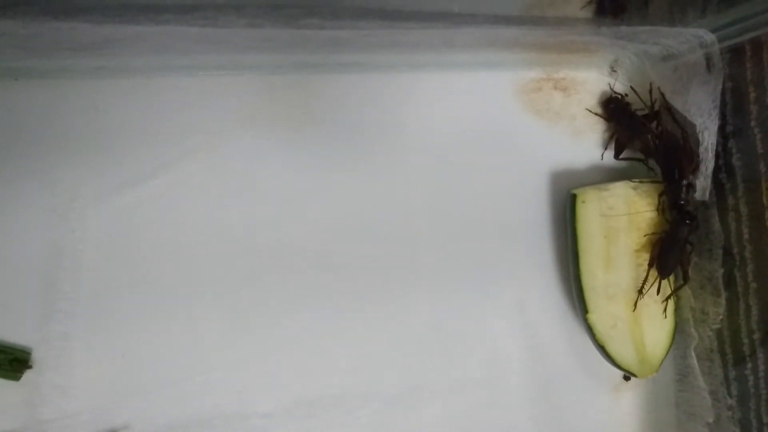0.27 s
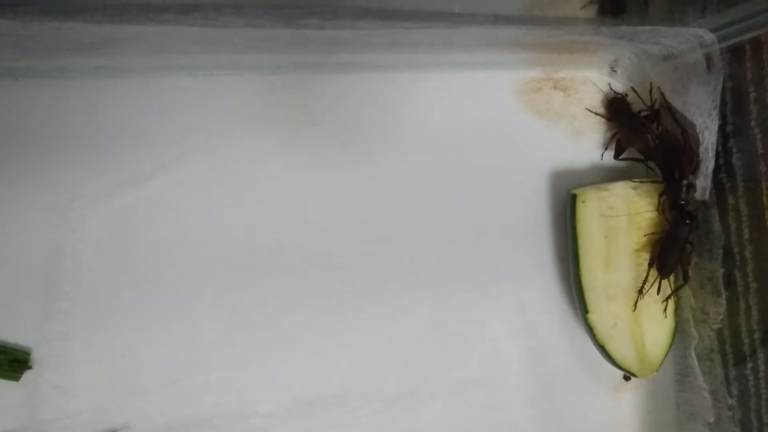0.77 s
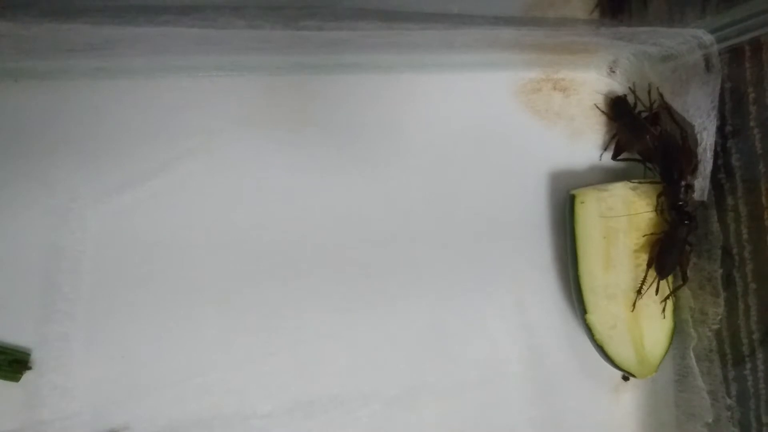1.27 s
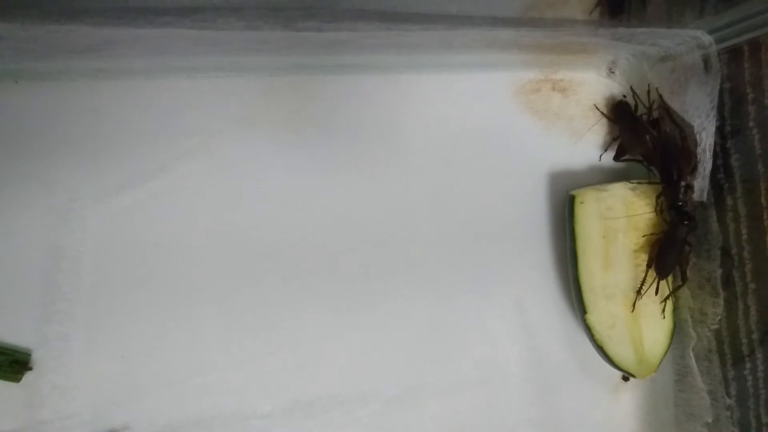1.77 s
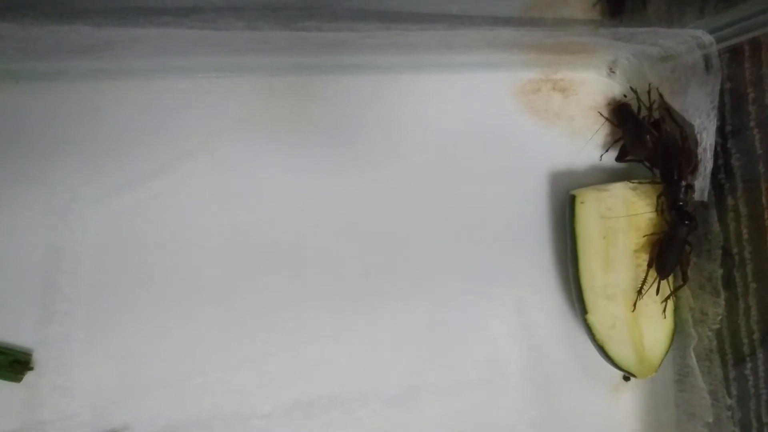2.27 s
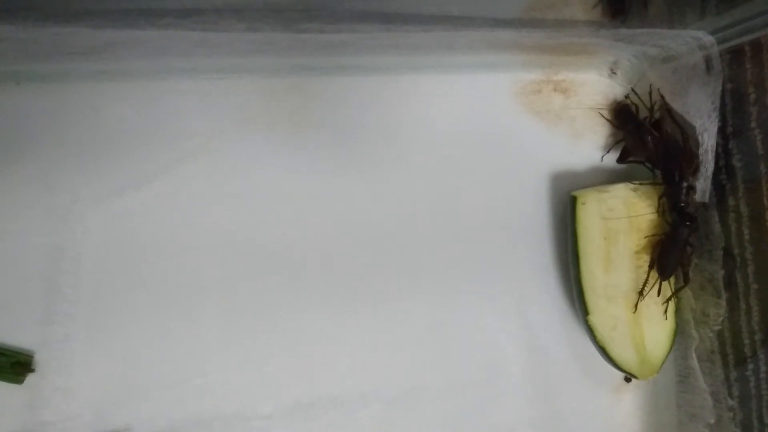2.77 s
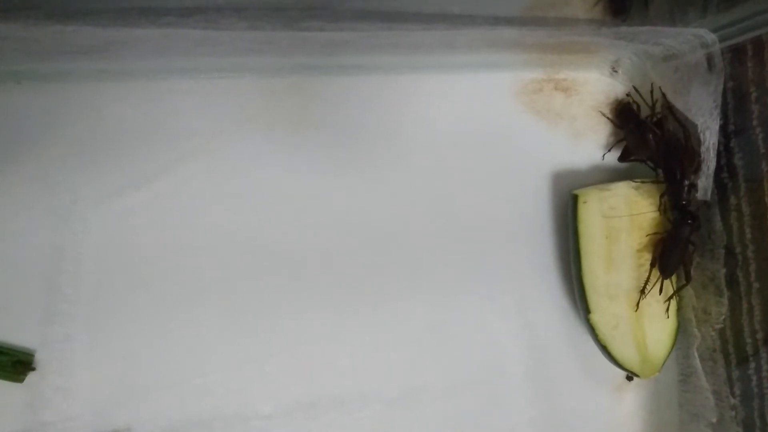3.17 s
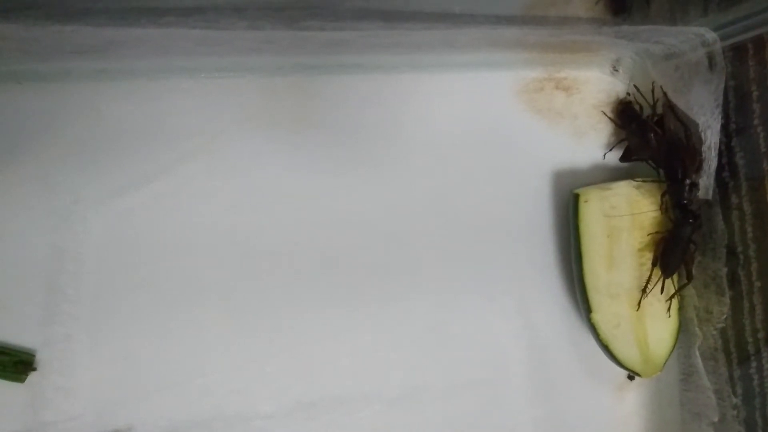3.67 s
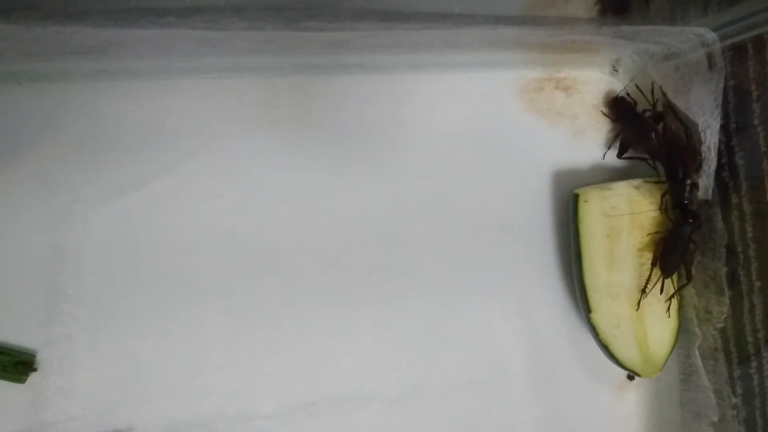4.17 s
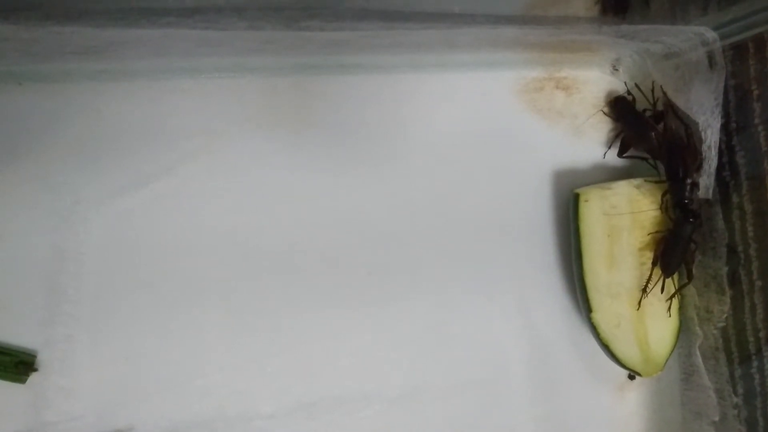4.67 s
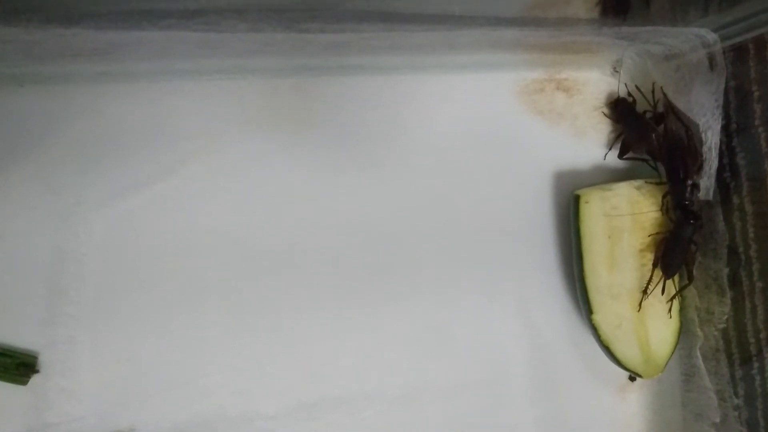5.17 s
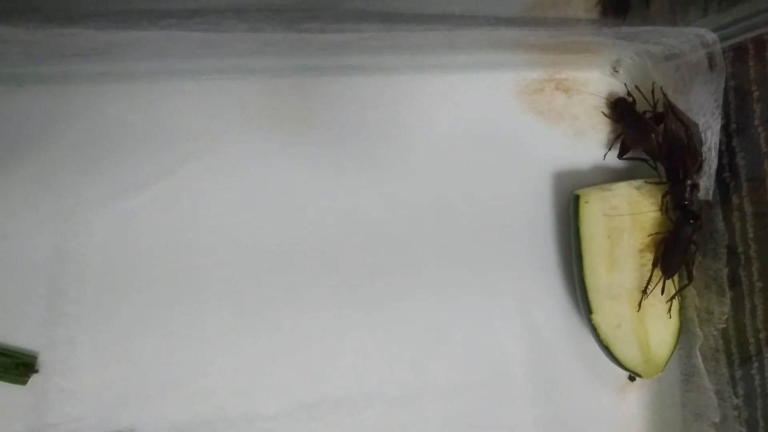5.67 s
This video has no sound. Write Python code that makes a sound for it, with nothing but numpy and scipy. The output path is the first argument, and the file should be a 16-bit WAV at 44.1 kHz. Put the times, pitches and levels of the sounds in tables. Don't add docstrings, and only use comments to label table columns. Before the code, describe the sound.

A cricket close by sings swelling pulsed chirps that run into long, steady, piercing trills, over a low fan hum in a small tub.

```python
import sys
import numpy as np
from scipy import signal
from scipy.fft import rfft, irfft, next_fast_len
from scipy.io import wavfile
from scipy.ndimage import uniform_filter1d

SR = 44100
rng = np.random.default_rng(int(sys.argv[2]) if len(sys.argv) > 2 else 0)


def dump(signal):
    limited = np.clip(np.atleast_2d(signal).T, -1, 1)
    pcm = np.round(limited * 32767).astype(np.int16)
    wavfile.write(sys.argv[1], SR, pcm)


def invert_db(x):
    u = np.asarray(x, float) / 20
    return 10 ** u


N = 261513

# pitch_hz, density_db (per Hz)
FAN_RUSH, FAN_RUSH_DB = [(15, -57.5), (25, -34), (59, -6.5), (208, -4.5), (234, -0.5), (345, -18.5),
                         (410, -25), (764, -29.5), (1040, -26.5), (1150, -38.5), (1760, -39.5), (2600, -30),
                         (3380, -17.5), (5720, -120)], -48
# pitch_hz, density_db (per Hz)
MIC_HISS, MIC_HISS_DB = [(2800, -9), (4500, 6.5), (5800, 1), (7000, -2.5), (8600, -5), (12000, -0.5),
                         (14000, 2), (15800, -12.5)], -50
# pitch_hz, likeness (0 to 1)
LIKENESS = [(60, 0.82), (200, 0.88), (550, 0.29), (1650, 0.03), (4970, 0.029), (15000, 0.098)]
# pitch_hz, left_over_right_db
LEAN = [(60, 2.5), (130, 7.5), (290, 8), (640, -1.5), (1410, 12.5), (3100, -5.5), (8600, 7), (10600, -0.5)]
# multiple (of the shaft rate), level_db
SHAFT_ORDERS = [(2, -89), (3, -58.5), (4, -55), (5, -53.5), (6, -50), (7, -59.5), (10.63, -69.5),
                (16.8, -77.5), (21, -75.5), (22.4, -75.5), (24, -72.5), (27, -69.5)]
SHAFT_HZ = 38.78
WHINE_HZ, WHINE_SWING_HZ, WHINE_DB = 14040, 198, -64

# start_s, level_db, pitch_hz
TICKS = [
    (0.079, -60, 5000),
    (0.296, -61, 1460),
    (1.718, -43.5, 1420),
    (4.666, -69, 1500),
    (4.797, -39, 10340),
    (4.81, -33.5, 10100),
    (4.837, -41, 10200),
    (4.882, -48, 10500),
]

# start_s, effort_db, scrape_db, first_pitch_hz, length_s
CHIRPS = [(0.108, -52, -60.5, 3800, 0.03666), (0.191, -41, -57.5, 3520, .032),
          (.270, -40.5, -55, 3950, 0.0385), (0.351, -37, -61.5, 4000, 0.039),
          (0.434, -32, -64, 3900, 0.046), (0.514, -26.5, -54.5, 3740, .050), (0.595, -22, -53, 3790, .051),
          (0.68, -21, -53.5, 3790, .050), (.763, -21, -54.5, 3790, .052), (.846, -20, -55, 3780, .051),
          (4.794, -48.5, -61, 3360, 0.026), (4.886, -41.5, -55.5, 3500, 0.029),
          (4.97, -39, -51.5, 3520, .024), (5.048, -38.5, -54.5, 3800, .037),
          (5.130, -36, -62, 3920, 0.0413), (5.214, -29, -59.5, 3950, 0.043),
          (5.298, -24.5, -56.5, 3720, 0.051), (5.379, -22, -56.5, 3790, 0.053),
          (5.462, -22.5, -51.5, 3810, .045), (5.545, -20.5, -50, 3780, 0.053),
          (5.632, -21, -53.5, 3800, .051)]
# start_s, effort_db, pitch_hz, scrape_db
TRILL_LONG = [(0.933, -31, 3452, -55.5), (0.9725, -30, 3463, -50), (1.009, -28.5, 3456, -54),
              (1.0493, -27, 3456, -52.5), (1.0931, -27.5, 3457, -64), (1.1353, -26.5, 3453, -55),
              (1.1756, -27, 3458, -54.5), (1.2173, -27.5, 3465, -52.5), (1.2607, -27, 3468, -51.5),
              (1.3023, -25.5, 3456, -53), (1.344, -26, 3460, -52), (1.3869, -26, 3465, -51.5),
              (1.4283, -26.5, 3472, -56), (1.4716, -25, 3470, -56), (1.512, -27.5, 3467, -55),
              (1.5546, -27, 3466, -53), (1.595, -26, 3466, -57), (1.6376, -26, 3466, -50.5),
              (1.6808, -25.5, 3447, -52), (1.722, -27, 3472, -49.5), (1.763, -26, 3457, -50),
              (1.805, -26.5, 3468, -47.5), (1.8489, -25.5, 3454, -55.5), (1.8897, -24.5, 3454, -51),
              (1.9339, -25, 3466, -53.5), (1.977, -25.5, 3450, -52), (2.0175, -27.5, 3480, -54.5),
              (2.059, -26.5, 3460, -51.5), (2.1023, -26, 3460, -51), (2.144, -25.5, 3463, -53.5),
              (2.186, -25.5, 3455, -56),
              (2.229, -25.5, 3464, -53.5), (2.2693, -26, 3463, -50), (2.312, -27, 3469, -49),
                 (2.354, -26.5, 3464, -54), (2.3946, -26.5, 3460, -53), (2.4401, -27.5, 3482, -51),
                 (2.4811, -27.5, 3462, -53), (2.5236, -26, 3460, -50.5), (2.5662, -26, 3433, -52),
                 (2.607, -27, 3440, -64), (2.648, -28, 3450, -50.5), (2.693, -27, 3440, -51.5),
                 (2.733, -26.5, 3436, -49.5), (2.7758, -27, 3464, -52.5), (2.8205, -26.5, 3445, -46.5),
                 (2.861, -25.5, 3463, -53), (2.904, -24.5, 3466, -55), (2.9468, -25.5, 3482, -55),
                 (2.9882, -25.5, 3465, -59), (3.0306, -26, 3462, -54.8), (3.0712, -26.5, 3430, -54),
                 (3.1125, -26, 3457, -55), (3.1567, -27.5, 3466, -54.5), (3.2, -27, 3460, -50),
                 (3.24, -26.5, 3440, -56), (3.2797, -27, 3470, -53.5), (3.324, -26, 3460, -52),
                 (3.3648, -27, 3468, -53), (3.4047, -26.5, 3452, -52), (3.449, -26, 3456, -52),
                 (3.491, -26.5, 3456, -55), (3.5314, -26.5, 3457, -55.5), (3.575, -25.5, 3456, -54.5),
                 (3.6184, -27.5, 3472, -52), (3.6592, -29.5, 3466.0, -53.5), (3.701, -28.5, 3467, -54),
                 (3.7427, -27, 3469, -55), (3.7848, -27, 3485, -49.5), (3.825, -28, 3392, -55.5)]
# start_s, effort_db, pitch_hz, scrape_db
TRILL_LOOSE = [(4.0631, -41, 3376, -62), (4.0961, -46.5, 3426, -53), (4.132, -36.5, 3436, -50),
               (4.1712, -33, 3428, -52.5), (4.2134, -34.5, 3463, -51.5), (4.2537, -32.8, 3445, -55.5),
               (4.2935, -33, 3456, -51), (4.3299, -32, 3455, -54), (4.3764, -32, 3467, -53.1),
               (4.4178, -33, 3460, -50.5), (4.4577, -33, 3457, -60), (4.504, -33, 3468, -54),
               (4.5456, -32.5, 3465, -56), (4.5896, -32, 3386, -53.5), (4.644, -49, 3213, -59)]
# start_s, effort_db, pitch_hz, scrape_db
TRILL_RETURN = [
    (5.711, -32, 3470, -54),
    (5.749, -30, 3446, -51),
    (5.788, -29.5, 3497, -56),
    (5.8269, -28, 3473, -55.5),
    (5.868, -28.5, 3480, -49.5),
    (5.91, -26.5, 3530, -51.5),
]
RELEASES_EARLY = [1.0012, 1.0417, 1.082, 1.1264, 1.166, 1.208, 1.2496, 1.2922, 1.3353, 1.3762, 1.4182,
                  1.4606, 1.5024, 1.5448, 1.5872, 1.629, 1.6697, 1.7122, 1.754, 1.7956, 1.8373, 1.879,
                  1.9218, 1.9652, 2.0082, 2.05, 2.0928, 2.134, 2.1751, 2.2182, 2.2606, 2.302, 2.344, 2.385,
                  2.4281, 2.4699, 2.5145, 2.5556, 2.601, 2.6419, 2.6825, 2.7263]
RELEASES_LATE = [2.7677, 2.8088, 2.8513, 2.8941, 2.9358, 2.977, 3.0204, 3.0605, 3.105, 3.147, 3.188, 3.2302,
                 3.2723, 3.3144, 3.3566, 3.3973, 3.4422, 3.481, 3.523, 3.565, 3.6085, 3.6495, 3.6923, 3.734,
                 3.7769, 3.8174, 3.8591, 4.2406, 4.2837, 4.3234, 4.365, 4.4069, 4.4484, 4.491, 4.5353,
                 4.578, 4.624, 5.74, 5.7797, 5.8184, 5.859, 5.9014]

# share_of_length, tone_db, share_of_glide_left, scrape_db
HARD_SHAPE = [(0, -35, 1, -1.5), (.055, -10, 1, -5.5), (.2, -10.5, 0.81, -8), (.33, -5.5, 0.95, -2.5),
              (.41, -2.5, 0.87, -14), (.46, -3, 0.92, 7.5), (.6, -1, .72, -3), (.92, -1.5, 0.23, -8.5),
              (1, -25.5, 0.17, -15)]
# share_of_length, tone_db, share_of_glide_left, scrape_db
SOFT_SHAPE = [(0, -25.5, 0.94, -4), (0.07, -12.5, 0.96, -6), (.3, -9.5, 0.48, -8), (.5, -2, 0.38, -14),
              (.75, -2, .22, -3), (.92, 1, 0.083, -1), (1, -29.5, 0.012, -0.5)]
# share_of_length, tone_db, share_of_glide_left, scrape_db
TRILL_SHAPE = [(0, -29.5, 1.5, -8), (0.14, -17, 1.13, 0.5), (0.4, -4.5, 0.6, -5.5), (.65, -3, 0, -8.5),
               (.88, -2.5, -1, -10), (1, -8.5, -3.5, -14.5)]
# share_of_length, tone_db, share_of_glide_left, scrape_db
LOOSE_SHAPE = [(0, -31, 1, -6), (0.2, -18, 1, 1.5), (0.33, -13, 1.8, -1.5), (.4, -1.5, .5, -4.5),
               (.65, -2.5, 1, -12), (.88, -3.5, -1, -12), (1, -10, -3, -20)]
TRILL_S, TRILL_GLIDE_HZ = 0.03, 45.2
HARD_DB, FULL_S = -27.5, 0.051
LAST_HZ, SOFT_LAST_HZ = 3136, 3322
WEAK_SAG_HZ_PER_DB = 6.5
HOOK_HZ, HOOK_S = 333, 0.005
SCRAPE_DELAY_S = 0.002

# pitch_hz, width_hz
MEMBRANE = (3520, 750)
# multiple, level_db, growth (dB per dB of effort)
OVERTONES = [(2, -23, 0.54), (3, -25.5, 0.96), (4, -21.5, 0.75)]
# pitch_hz, width_hz, level_db
WING_CELLS = [(6970, 160, 5), (10400, 160, 3)]
# pitch_hz, density_db (per Hz)
SCRAPE = [(2200, -22), (2900, -1), (3600, 5), (4900, -2.5), (6200, 4), (7900, -8), (8800, 3), (11500, -8),
          (13500, -0.5), (15800, -12)]
# pitch_hz, width_hz, level_db
RASP_MODES = [(3950, 130, -20), (4972, 136, 1), (5510, 108, -10.5), (9060, 380, -8.5), (10850, 120, -2),
              (13400, 220, -10.5)]
BLUR_FROM_DB, BLUR_SINK, BLUR_FLICKER = -27, 0.9, 0.5
FLICKER_DB, FLICKER_HZ = 4, 110
SPLIT_HZ = 11000

# delay_s, level_db
LEFT_ECHOES = [(0.00025, -5.8), (0.00098, -7.9), (0.00189, -5.2), (0.00306, -5.8), (0.00437, -19.3),
               (0.00556, -11.5), (0.00685, -10.7), (0.00785, -14.0), (0.00913, -25.4), (0.01065, -14.8),
               (0.01159, -19.6), (0.01269, -18.1), (0.01471, -12.2), (0.01617, -17.7), (0.01801, -16.4),
               (0.019, -20.8), (0.02044, -19.5), (0.02334, -16.6), (0.02451, -24.8), (0.02598, -19.7)]
WALL_ECHOES = LEFT_ECHOES, [(0.003, -0.1), (0.00408, -20.3), (0.00543, -9.7), (0.00735, -12.5),
               (0.00929, -7.8), (0.01065, -20.4), (0.01402, -20.4), (0.0165, -19.0), (0.01869, -16.7),
               (0.02616, -18.5)]
TRAVEL_S = 0.003
# left_db, right_db
TAIL_DB = [-13, -16]
# pitch_hz, decay_s
TAIL_T60 = [(2000, 0.037), (4000, 0.11), (6000, 0.087), (15000, 0.012)]
TREBLE_T60_S = 0.091
# left_db, right_db
TREBLE_DB = [10, 1.5]
# pitch_hz, left_db, right_db
BEARING = [(3720, 1, -0.5), (3790, 8.5, -2), (6620, -12, 0), (7090, 1, -8.5), (9760, -5, -19),
           (10520, -23.5, 8), (12500, 1.5, -1), (13860, -12, -1)]

SHUT_DB, SHUT_BELOW_DB, OPEN_ABOVE_DB = -4.5, -60.5, -22.5
LISTEN_S, OPENS_DB_PER_S, SHUTS_DB_PER_S = 0.021, 7.5, 74
# pitch_hz, level_db
TOP_FALL = [(20, 1), (14350, -2), (14750, -5), (15300, -10), (16000, -16)]
TOP_HZ, TOP_OPENS_DB, TOP_HOLD_S = 14570, -70, 0.0225


def evened(x):
    return x / np.sqrt(np.mean(x ** 2) + 1e-20)


def read(points, hz):
    f, value = np.transpose(points)
    return np.interp(np.log(hz + 1), np.log(f + 1), value)


def colour(x, points):
    size = next_fast_len(x.shape[-1] + 4096)
    gain = invert_db(read(points, np.fft.rfftfreq(size, 1 / SR)))
    return irfft(rfft(x, size) * gain, size)[..., :x.shape[-1]]


def wander(hz):
    smooth = signal.butter(2, hz, fs=SR / 16, output="sos")
    coarse = signal.sosfiltfilt(smooth, rng.standard_normal(N // 16 + 2))
    return np.interp(np.arange(N) / 16, np.arange(len(coarse)), evened(coarse))


def resonate(x, hz, width):
    r = np.exp(-np.pi * width / SR)
    spin = np.exp(2j * np.pi * hz * np.arange(N) / SR)
    return 2 * (spin * signal.lfilter([1 - r], [1, -r], x / spin)).real


def air():
    size = next_fast_len(N)
    left, other = rfft(rng.standard_normal((2, size)))
    same = np.clip(read(LIKENESS, np.fft.rfftfreq(size, 1 / SR)), 0, 1)
    right = same * left + np.sqrt(1 - same ** 2) * other
    pair = irfft([left, right], size)[:, :N]
    rush = invert_db(FAN_RUSH_DB) * evened(colour(pair, FAN_RUSH))
    hiss = invert_db(MIC_HISS_DB) * evened(colour(pair, MIC_HISS))
    return rush + hiss


def motor():
    turn = 2 * np.pi * np.cumsum(SHAFT_HZ * (1 + 0.00437 * wander(3.9))) / SR
    hum = np.zeros(N)
    for multiple, db in SHAFT_ORDERS:
        hum += invert_db(db + 1.0 + 1.0 * wander(5.6)) * np.sin(multiple * turn + 7 * rng.random())
    sweep_hz = WHINE_HZ + WHINE_SWING_HZ * wander(40.14) + 120 * wander(599)
    whine_turn = 2 * np.pi * np.cumsum(sweep_hz) / SR
    whine = [invert_db(WHINE_DB - 2.5 + 4.9 * wander(96)) * np.sin(whine_turn + side) for side in range(2)]
    return hum, np.array(whine)


def feet():
    out, t = np.zeros(N), np.arange(600) / SR
    for start, db, hz in TICKS:
        out[round(start * SR):][:600] += invert_db(db - 60 * t / 0.015) * np.sin(2 * np.pi * hz * t)
    return out


def held(start):
    wait = np.concatenate([np.ravel(RELEASES_EARLY), np.ravel(RELEASES_LATE)]) - start
    return min(wait[(wait > 0.018) & (wait < 0.041)], default=TRILL_S)


def strokes():
    plan = []
    for start, db, scrape, first, length in CHIRPS:
        if db > HARD_DB:
            plan.append((start, db, scrape, first, LAST_HZ, length, FULL_S, HOOK_HZ, HARD_SHAPE))
        else:
            last = SOFT_LAST_HZ + WEAK_SAG_HZ_PER_DB * min(db + 38, 0)
            plan.append((start, db, scrape, first, last, length, length, 0, SOFT_SHAPE))
    firm = TRILL_LONG + TRILL_RETURN
    for rows, shape in [(firm, TRILL_SHAPE), (TRILL_LOOSE, LOOSE_SHAPE)]:
        for start, db, last, scrape in rows:
            length = held(start)
            plan.append((start, db, scrape, last + TRILL_GLIDE_HZ, last, length, length, 0, shape))

    tone_db, scrape_db = np.full(N, -120.), np.full(N, -120.)
    hz = np.full(N, MEMBRANE[0], float)
    for start, db, scrape, first, last, length, travel, hook, shape in plan:
        at = np.arange(round(start * SR), min(round((start + length) * SR), N))
        share, level, glide, rasp = np.transpose(shape)
        t = at / SR - start
        tone_db[at] = db + np.interp(t / length, share, level)
        hz[at] = last + (first - last) * np.interp(t / travel, share, glide) + hook * np.exp(-t / HOOK_S)
        scrape_db[at] = scrape + np.interp(t / length, share, rasp)
    return tone_db, hz, np.roll(scrape_db, round(SCRAPE_DELAY_S * SR))


def wing_overtones(tone_db, grip_db, turn):
    blur_db = uniform_filter1d(np.maximum(tone_db - BLUR_FROM_DB, 0), size=400)
    over = np.zeros(N)
    for multiple, db, growth in OVERTONES:
        flicker_db = (FLICKER_DB + BLUR_FLICKER * blur_db) * wander(FLICKER_HZ)
        level_db = db + growth * (grip_db + 28) - 28 - BLUR_SINK * blur_db + flicker_db
        over += invert_db(level_db) * np.sin(multiple * turn)
    return over + sum(invert_db(db) * resonate(over, hz, width) for hz, width, db in WING_CELLS)


def scrape_noise(scrape_db):
    below = [(SPLIT_HZ - 500, 0), (SPLIT_HZ + 500, -40)]
    above = [(SPLIT_HZ - 500, -40), (SPLIT_HZ + 500, 1.5)]
    low = colour(rng.standard_normal(N) * invert_db(5.47 * wander(580)), below)
    high = colour(rng.standard_normal(N) * invert_db(2.8 * wander(450)), above)
    slips = (low + high) * uniform_filter1d(invert_db(scrape_db + 5.0), size=12)
    ringing = sum(invert_db(db + 12.0) * resonate(slips, hz, width) for hz, width, db in RASP_MODES)
    return colour(slips + ringing, SCRAPE)


def cricket():
    tone_db, hz, scrape_db = strokes()
    turn = 2 * np.pi * np.cumsum(hz + 7 * wander(200)) / SR
    grip_db = tone_db + 0.83 * wander(140)
    tone = resonate(invert_db(grip_db) * np.sin(turn), *MEMBRANE)
    return invert_db(7.0) * tone + wing_overtones(tone_db, grip_db, turn) + scrape_noise(scrape_db)


def tub(x):
    size = SR // 4
    taps = np.zeros((2, size))
    at = np.arange(400, size - 20, 20) + rng.integers(0, 20, (2, (size - 401) // 20))
    np.put_along_axis(taps, at, rng.choice([-1., 1.], at.shape), 1)
    hz, t, z = signal.stft(taps, SR, nperseg=256)
    decay = invert_db(-60 * t / read(TAIL_T60, hz)[:, None])
    tail = signal.istft(z * decay, SR, nperseg=256)[1]
    tail *= invert_db(np.array(TAIL_DB))[:, None] / np.linalg.norm(tail, axis=1, keepdims=True)
    for side, walls in enumerate(WALL_ECHOES):
        for delay, db in walls:
            tail[side] += invert_db(db) * np.sinc(np.arange(tail.shape[1]) - delay * SR)
    treble = colour(tail, [(4100, -40), (4700, 0), (20000, 0)])
    late = abs(np.arange(tail.shape[1]) / SR - TRAVEL_S)
    treble_db = np.array(TREBLE_DB)[:, None] - 60 * late / (TREBLE_T60_S + 2 * late)
    tail += treble * (invert_db(treble_db) - 1)
    return signal.oaconvolve(x[None], tail, axes=1)[:, round(TRAVEL_S * SR):][:, :N]


def suppressor(song):
    power = abs(uniform_filter1d((song ** 2).mean(0), round(LISTEN_S * SR)))
    heard_db = 10 * np.log10(power + 1e-12)
    wish_db = np.interp(heard_db, [SHUT_BELOW_DB, OPEN_ABOVE_DB], [SHUT_DB, 0])
    fall = np.arange(N) * SHUTS_DB_PER_S / SR
    rise = np.arange(N) * OPENS_DB_PER_S / SR
    held_db = np.maximum.accumulate(wish_db + fall) - fall
    return invert_db(np.minimum.accumulate(held_db - rise) + rise)


def scene():
    hum, whine = motor()
    back = air() + hum
    left = colour(back[0], [(hz, db / 2) for hz, db in LEAN])
    right = colour(back[1], [(hz, -db / 2) for hz, db in LEAN])
    back = np.array([left, right])
    upper = colour(back, [(300, -11.0), (450, 1.0), (600, 5.0), (1500, 6.5), (3000, 7.0), (20000, 6.0)])
    hz, *sides = np.transpose(BEARING)
    in_tub = tub(cricket() + feet())
    song = np.array([colour(x, np.transpose([hz, db])) for x, db in zip(in_tub, sides)])
    return song + back + upper * (suppressor(song) - 1) + whine


def top_cut(x):
    return signal.sosfilt(signal.butter(12, 15750, fs=SR, output="sos"), x)


def record(dry):
    fade = np.minimum(np.arange(N) / (0.012 * SR), 1)
    heard = colour(dry, TOP_FALL)
    top = colour(heard, [(TOP_HZ - 60, -80), (TOP_HZ + 60, 0)])
    top_power = abs(uniform_filter1d((top ** 2).mean(0), round(TOP_HOLD_S * SR)))
    top_db = 10 * np.log10(top_power + 1e-14)
    heard = heard - top * np.clip((TOP_OPENS_DB - top_db) / 2, 0, 1)
    return top_cut((heard - 0.0013) * fade)


dry = scene()
out = record(dry)
dump(out)
```